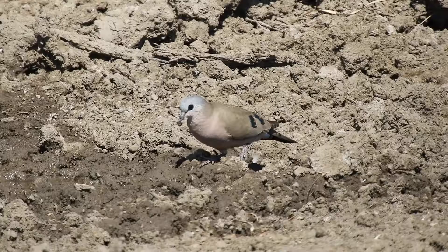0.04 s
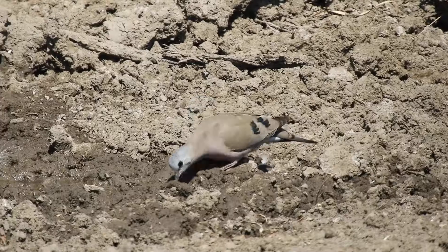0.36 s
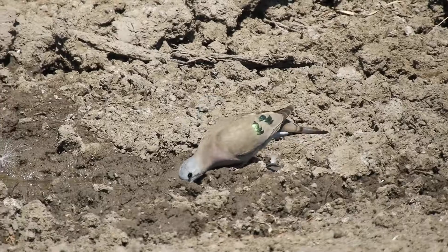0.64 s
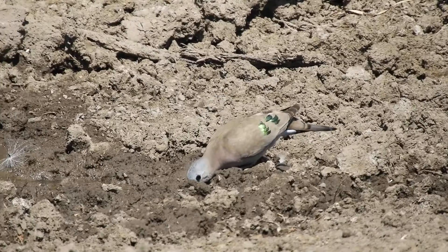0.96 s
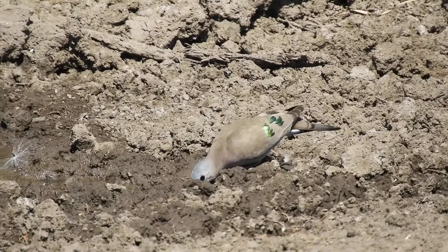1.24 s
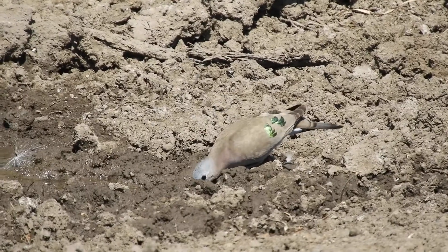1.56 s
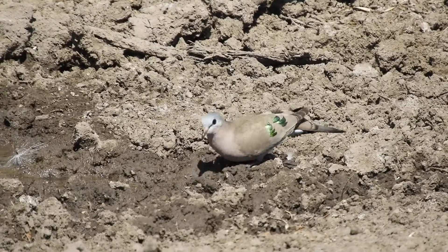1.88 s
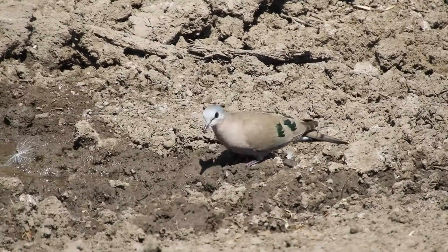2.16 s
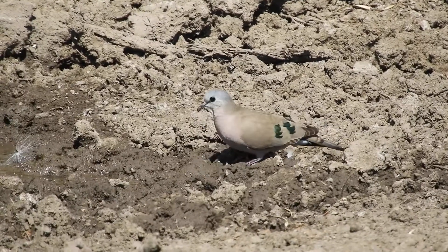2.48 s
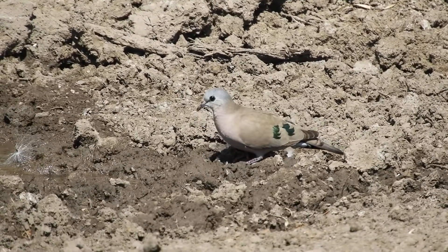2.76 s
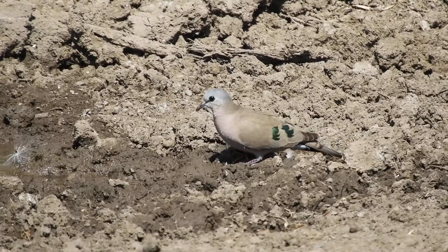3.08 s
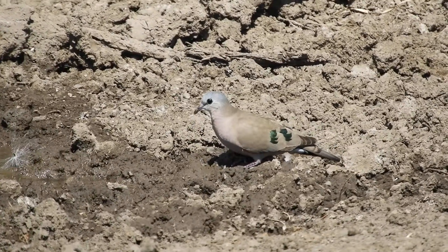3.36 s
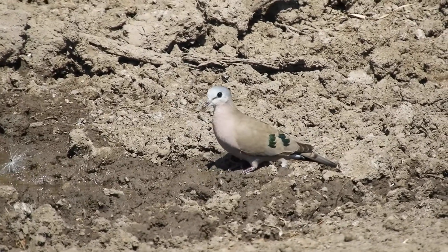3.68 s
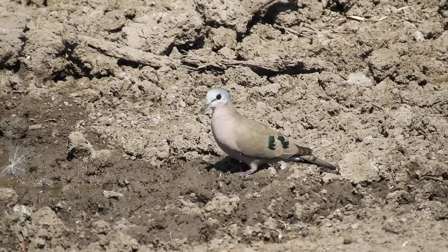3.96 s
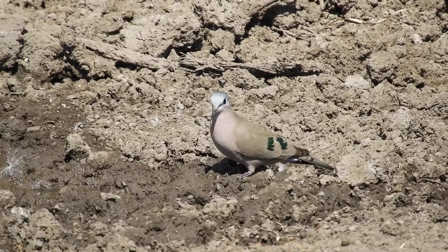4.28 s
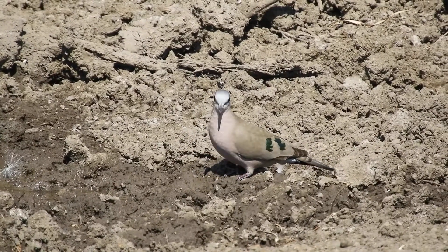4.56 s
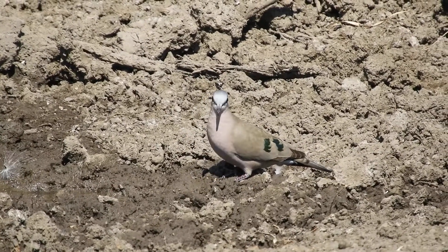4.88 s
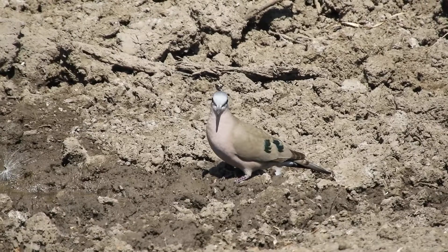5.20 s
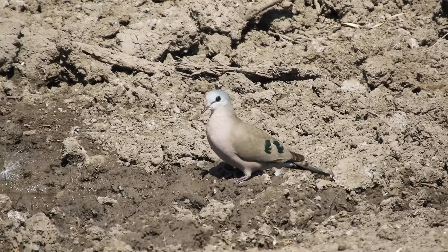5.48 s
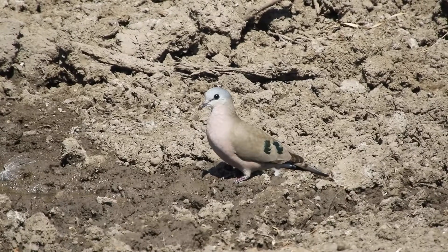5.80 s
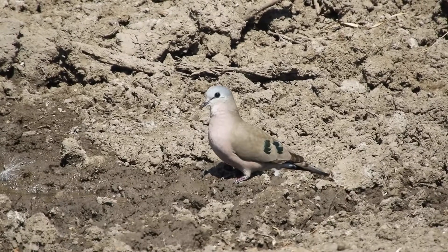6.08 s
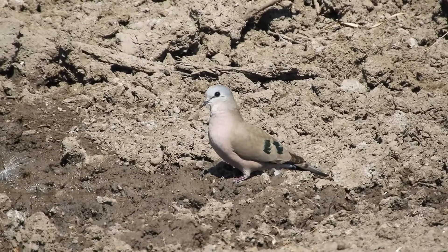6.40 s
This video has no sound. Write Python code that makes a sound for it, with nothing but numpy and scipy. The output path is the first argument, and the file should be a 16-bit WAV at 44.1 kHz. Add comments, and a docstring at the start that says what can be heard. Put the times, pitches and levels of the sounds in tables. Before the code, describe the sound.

Outdoors in open ground, wind buffets the microphone in uneven low gusts, with several hard thumps. Much quieter, a small bird whistles twice, high and rising, among scattered dry clicks, short rustles and distant chirps over a soft hiss. High twittering rises briefly in the middle. Near the end a faint trill passes with a single sharp tick right at the microphone, and the gusts fade away.

```python
"""A dove drinks at a muddy waterhole. The camera's sound opens with a click, and gusts buffet both ports
of its microphone over a soft hiss. A small bird gives the first of two thin, rising, two-voiced
whistles. Hard buffets pop; after each the hiss dips and swells back. A few dry clicks and brief rustles
follow, and other birds chirp farther off. A high twittering swells around 3 s; near 5 s come
a faint trill and one very sharp tick, and then the wind dies down."""
import sys
import numpy as np
from scipy import signal
from scipy.fft import rfft, irfft, next_fast_len
from scipy.io import wavfile
from scipy.ndimage import uniform_filter1d, minimum_filter1d, map_coordinates

SR = 44100
rng = np.random.default_rng(int(sys.argv[2]) if len(sys.argv) > 2 else 0)


def materialize(psi):
    """Save the field psi as 16-bit PCM at rate SR to the path in sys.argv[1].

    A 1-D psi becomes a single channel; in a 2-D psi each row is a channel.
    """
    bounded = np.clip(np.atleast_2d(psi).T, -1, 1)
    quanta = np.round(bounded * 32767).astype(np.int16)
    wavfile.write(sys.argv[1], SR, quanta)


N = 292824
TIME = np.arange(N) / SR


def amp(db):
    return 10 ** (np.asarray(db) / 20)


def unit_rms(x):
    return x / np.sqrt(np.mean(x ** 2, axis=-1, keepdims=True) + 1e-20)


def running_rms(x, window_s):
    return np.sqrt(np.abs(uniform_filter1d(x ** 2, max(int(window_s * SR), 1))) + 1e-9)


def along(points, hz):
    """Read (freq_hz, value) points on a log frequency axis."""
    freqs, values = np.transpose(points)
    return np.interp(np.log(hz + 1), np.log(freqs + 1), values)


def automation(rows):
    """One curve for each column after the time."""
    times, *columns = np.transpose(rows)
    return [np.interp(TIME, times, column) for column in columns]


def wobble(rate, n=N):
    """A smooth random curve, rate knots a second."""
    return map_coordinates(rng.standard_normal(int(n * rate / SR) + 4), [np.arange(n) * rate / SR])


def filtered(x, response):
    """EQ x with a gain that is a function of frequency."""
    n = x.shape[-1]
    size = next_fast_len(n + 8192)
    return irfft(rfft(x, size) * response(np.fft.rfftfreq(size, 1 / SR)), size)[..., :n]


def noise(spectrum):
    """Two unrelated noises of rms 1 with the given colour."""
    return unit_rms(filtered(rng.standard_normal((2, N)), lambda hz: amp(along(spectrum, hz))))


def tone(hz):
    """A sine of rms 1 on a moving pitch."""
    return np.sqrt(2) * np.sin(2 * np.pi * np.cumsum(hz) / SR)


def panned(pan_db):
    """Constant-power gains; pan_db is left minus right."""
    gains = amp([[pan_db / 2], [-pan_db / 2]])
    return gains / np.sqrt(np.mean(gains ** 2))


def add(track, start_s, x):
    """Mix x into the track from start_s."""
    part = track[..., max(round(start_s * SR), 0):][..., :x.shape[-1]]
    part += x[..., :part.shape[-1]]


# Gust automation, before trims and surges: time_s, rumble_db, flutter_db, pan_db
GUSTS = [(0.13, -21, -51.5, 14), (0.36, -18.5, -44.5, 10), (0.6, -29, -57.5, 3), (0.83, -35.5, -70.5, 8),
         (1.08, -16.0, -45.5, -9), (1.43, -28.5, -66, 7), (1.7, -11, -36, 12.5), (1.92, -14, -35, 14.5),
         (2.07, -23.5, -50, 2), (2.35, -11, -32.5, 3.5), (2.5, -18.5, -42.5, -1), (2.75, -20.0, -41, 4.5),
         (3.28, -20.5, -53, 1), (3.68, -24.5, -50, 14), (4.27, -11, -27.5, 5), (4.45, -16.5, -38.5, 7),
         (4.75, -17.5, -40.5, 9.5), (5.2, -12, -29.0, 3.5), (5.58, -25, -54, 5), (5.75, -17.5, -43.5, 17),
         (6.0, -29.5, -57, 3), (6.3, -20.5, -51.5, 7.5), (6.42, -44, -78, 10), (6.63, -52, -69, -1)]
# Single puffs on the rumble; a port in the lee falls instead: centre_s, length_s, left_db, right_db
WIND_PUFFS = [(0.27, 0.024, 8.5, 12), (0.689, 0.076, -1, 13), (1.165, 0.068, 13.5, 3),
              (1.33, 0.054, 10.5, 13), (1.492, 0.055, 13, -13), (1.829, 0.029, 3, 9.5),
              (1.973, 0.073, 0, 11.5), (2.389, 0.048, 5.5, 5.5), (2.807, 0.023, 8.5, 1),
              (2.9, 0.046, 10, 4.5), (3.153, 0.11, 5.5, -8.5), (3.303, 0.17, 3.5, -13),
              (3.551, 0.082, 9.5, -15), (3.808, 0.08, 7.5, 2), (4.547, 0.086, 4.0, -1),
              (4.945, 0.031, 4.0, -2.5), (5.433, 0.069, 6.0, -1.5), (5.849, 0.03, 19, 6),
              (5.921, 0.062, 8.5, 10), (6.029, 0.052, 6.5, 3.5), (6.121, 0.03, 11, 9.5),
              (6.221, 0.043, 4.5, 8)]
# Brief lulls at both ports: centre_s, length_s, dip_db
WIND_LULLS = [(0.661, 0.039, -24), (3.242, 0.065, -8.5), (3.477, 0.016, -11.5), (5.882, 0.034, -3),
              (6.075, 0.025, -12), (6.172, .035, -10)]
# Colours of the low rumble, the brighter flutter and its upper fringe: freq_hz, level_db
RUMBLE_EQ = [(15, -42.5), (25, -19), (45, -7.5), (76, 2), (120, 2), (175, 0), (212, -4), (250, -17),
             (310, -27.5), (450, -65.5), (900, -120)]
FLUTTER_EQ = [(120, -59.5), (250, 1.5), (340, 2), (450, -7.5), (600, -25.5), (900, -46.5), (3000, -120)]
FRINGE_EQ = [(250, -50), (450, 5), (620, -1.5), (760, -12.5), (950, -33), (1600, -39.5), (6000, -110)]


def wind(rumble_trim_db=-1, flutter_trim_db=2, fringe_trim_db=-9, swirl_db=1.5, fitful_db=0.6,
         lump_db=2.5, flutter_growth=1.297, fringe_growth=1.6, knee_db=-26, deep_hz=86, even_db=-19.5):
    """Each port has its own eddies; the strongest tear off a brighter flutter in short lumps."""
    rumble_db, flutter_db, pan_db = automation(GUSTS)
    facing_db = np.array([pan_db, -pan_db]) / 2
    weakness = (rumble_db.max() - rumble_db) / np.ptp(rumble_db)  # weak wind is more fitful
    surge_db = (swirl_db + fitful_db * weakness) * np.array([wobble(16), wobble(16)])
    bump = lambda centre_s, length_s: np.exp(-(2 * (TIME - centre_s) / length_s) ** 2)
    for centre_s, length_s, left_db, right_db in WIND_PUFFS:
        surge_db += np.outer([left_db, right_db], bump(centre_s, length_s))
    for centre_s, length_s, dip_db in WIND_LULLS:
        surge_db += dip_db * bump(centre_s, length_s)
    eddies = noise(RUMBLE_EQ)
    eddies = unit_rms(eddies / running_rms(eddies, 0.06))  # the gusts alone set the slow level
    lumps = amp(lump_db * np.array([wobble(42), wobble(42)])) * running_rms(eddies, 0.008) ** 1.53
    lumps = unit_rms(lumps / running_rms(lumps, 0.16))
    gust_db = flutter_db + flutter_growth * (facing_db + surge_db)
    fringe_db = knee_db + fringe_growth * (gust_db - knee_db)  # strong gusts are brighter
    flutter = amp(gust_db + flutter_trim_db) * noise(FLUTTER_EQ)
    fringe = amp(fringe_db + fringe_trim_db) * noise(FRINGE_EQ)
    port_db = rumble_db + 0.74 * facing_db
    deep = filtered(eddies, lambda hz: 1 / (1 + (hz / deep_hz) ** 4))
    rumble = eddies - deep + amp(0.79 * (even_db - port_db)) * deep  # slow wind has larger eddies
    return amp(port_db + surge_db + rumble_trim_db) * rumble + lumps * (flutter + fringe)


# Stereo image of airborne sound: freq_hz, left_right_correlation
AIR_IMAGE = [(200, 0.15), (1500, 0.17), (4500, 0.26), (9000, 0.22), (13000, 0.08)]


def airborne(pair):
    """Make two unrelated signals partly alike, as airborne sound is at the two ports."""
    angle = lambda hz: np.arccos(along(AIR_IMAGE, hz)) / 2
    mid, side = filtered(pair, lambda hz: np.array([np.cos(angle(hz)), np.sin(angle(hz))]))
    return np.array([mid + side, mid - side])


# Colour of the open-air bed: freq_hz, level_db
HISS_EQ = [(100, 23), (500, 4.5), (1100, -0.5), (2100, -2.5), (3400, -3), (4300, 1.5), (6000, -0.5),
           (9300, -0.5), (11000, -7.5), (14700, -12), (15500, -23)]


def hiss(opening_db=-47, patchy_db=1.85, drop_s=0.0096):
    """A soft, patchy bed of air and far calls; it ducks after each hard buffet and swells back."""
    level_db = opening_db
    for start_s, _, _, _, ducked_db, recovery_db_per_s in HARD_BUFFETS:
        ducked = np.clip((TIME - start_s) / drop_s, 0, 1)
        recovering_db = ducked_db + recovery_db_per_s * (TIME - start_s)
        level_db = (1 - ducked) * level_db + ducked * recovering_db
    bands = signal.stft(noise(HISS_EQ), nperseg=512)[2]
    patches = uniform_filter1d(rng.standard_normal(bands.shape[1:]), size=3, axis=0)
    patches = unit_rms(uniform_filter1d(patches, size=10, axis=1))
    air = signal.istft(bands * amp(patchy_db * patches), nperseg=512)[1][:, :N]
    return amp(level_db) * (airborne(air) + distant_calls())


def distant_calls(count=70, low_hz=1000, high_hz=5500, length_s=0.057, glide=0.32, waver=0.058):
    """Many very distant gliding calls, tucked into the hiss."""
    out = np.zeros((2, N))
    progress = np.linspace(0, 1, int(length_s * SR))
    for when, height in rng.random((count, 2)):
        slope, size, pan = rng.standard_normal(3)
        bend = glide * height * slope * progress + waver * wobble(150, len(progress))
        pitch_hz = low_hz * (high_hz / low_hz) ** height * np.exp(bend)
        envelope = amp(-19 + 2 * size) * np.hanning(len(progress))
        add(out, when * N / SR, panned(3 * pan) * envelope * tone(pitch_hz))
    return out


# The camera's start-up click, then the dry clicks:
# start_s, body_db, body_t60_s, treble_db, treble_t60_s, treble_pan_db
DRY_CLICKS = [(0.126, -24.5, 0.0078, -33, 0.0046, -13), (0.477, -44.5, .02, -32, 0.0082, 1.5),
              (0.533, -39.5, 0.037, -34.5, 0.0077, -5.5), (2.248, -45.5, 0.014, -34, 0.01, 2),
              (2.691, -57, 0.016, -46.5, 0.02, 0), (3.785, -62.5, .02, -51, 0.0082, 5),
              (3.914, -39.5, 0.022, -42.5, .014, -5.5), (4.291, -59, .02, -49.5, 0.025, -4.5)]
# Resonances of a click's hollow body: centre_hz, width_hz, level_db
CLICK_BODY = [(1020, 230, 9), (1660, 300, -4), (2390, 710, -1.5), (3430, 400, -10.5)]
# Colour of its treble: freq_hz, level_db
TREBLE_EQ = [(1000, -66.5), (3000, -34.5), (4300, -2.5), (5500, 1), (7500, -2), (9400, 2.5), (11000, -19.5),
             (15000, -23.5)]


def clicks(treble_delay_s=0.011, tail_db=-24, tail_t60_s=0.27):
    """Each click is one dry, hollow tick whose treble the camera passes about 10 ms late."""
    body, treble = np.zeros((2, 2, N))
    t = np.arange(SR // 5) / SR
    decay = lambda t60_s: amp(-60 * t / t60_s) + amp(tail_db - 60 * t / tail_t60_s)
    for start_s, body_db, body_t60_s, treble_db, treble_t60_s, pan_db in DRY_CLICKS:
        add(body, start_s, amp(body_db) * panned(2 * pan_db) * decay(body_t60_s))
        add(treble, start_s + treble_delay_s, amp(treble_db) * panned(pan_db) * decay(treble_t60_s))
    peaks = lambda hz: sum(amp(level_db) / (1 + (2 * (hz - centre_hz) / width_hz) ** 2)
                           for centre_hz, width_hz, level_db in CLICK_BODY)
    hollow = unit_rms(filtered(rng.standard_normal((2, N)), peaks))
    return body * hollow + treble * airborne(noise(TREBLE_EQ))


# The near bird: start_s, length_s, level_db, low_pitch_ratio, high_pitch_ratio, high_trim_db
WHISTLE_NOTES = [(0.195, .146, -47, 0.97, 1.005, -1.5), (1.575, 0.19, -37, 1, 0.999, 1.5)]
# Its low and high voice: start_hz, end_hz, bend_power (1 is straight), peak_db, edge_sag_db
WHISTLE_VOICES = [(6320, 7600, 1.3, 0, 6.9), (8280, 9470, 1.9, -6, 8.8)]


def whistles(hook_depth=0.052, hook_s=0.018, hook_period_s=0.02, hook_crest_s=0.0018,
             attack_s=0.004, release_s=0.002, waver=0.0025, flicker_db=1.55):
    """Both sides of the syrinx sound at once: a quick hook, then a long rise, loudest halfway."""
    out = np.zeros(N)
    for start_s, length_s, level_db, low_ratio, high_ratio, high_trim_db in WHISTLE_NOTES:
        t = np.arange(int(length_s * SR)) / SR
        progress = t / length_s
        hook_fade = np.exp(-(t / hook_s) ** 4)
        hook = hook_depth * hook_fade * np.cos(2 * np.pi * (t - hook_crest_s) / hook_period_s)
        gate = np.clip(np.minimum(t / attack_s, (length_s - t) / release_s), 0, 1)
        for voice, ratio, trim_db in zip(WHISTLE_VOICES, (low_ratio, high_ratio), (0, high_trim_db)):
            start_hz, end_hz, bend_power, peak_db, sag_db = voice
            rise_hz = end_hz - (end_hz - start_hz) * (1 - progress) ** bend_power
            pitch_hz = ratio * rise_hz * (1 + hook + waver * wobble(250, len(t)))
            shape_db = peak_db - sag_db * np.abs(2 * progress - 1) + flicker_db * wobble(90, len(t))
            add(out, start_s, gate * amp(level_db + trim_db + shape_db) * tone(pitch_hz))
    return out


# Hard wind hits: peak_s, push_db, pop_db, pan_db, ducked_hiss_db, hiss_recovery_db_per_s
HARD_BUFFETS = [(0.298, 0, -20.5, 10.5, -57, 6), (1.8571, -7, -17, 19.5, -55.5, 9.5),
                (2.413, -15, -28.5, -19, -56.5, 7.5), (3.544, -2, -25.5, 25.5, -55.5, 4),
                (4.3152, -8, -29.5, 10.5, -54.5, 1.75), (5.855, -4, -18, 25, -56.5, 4)]


def buffets(push_hz=130, build_s=0.0045, release_s=0.0018, pop_s=0.00063, tear_db=-10, tear_s=0.0069):
    """A hard eddy tears briefly, swings the diaphragm for a cycle or two and breaks off with a pop."""
    hits, tears = np.zeros((2, 2, N))
    t = np.arange(-SR // 20, SR // 20) / SR
    swell = lambda rise_s: np.exp(np.where(t < 0, t / rise_s, -t / release_s))
    push = np.cos(2 * np.pi * push_hz * t) * swell(build_s)
    pop = (1 + 0.3 * np.sign(t)) * np.exp(-np.abs(t) / pop_s)
    for peak_s, push_db, pop_db, pan_db, _, _ in HARD_BUFFETS:
        add(hits, peak_s + t[0], -panned(pan_db) * (amp(push_db) * push + amp(pop_db) * pop))
        add(tears, peak_s + t[0], panned(pan_db) * amp(pop_db + tear_db) * swell(tear_s))
    return hits + tears * noise(FRINGE_EQ)


# Short rustles: start_s, length_s, level_db
SHORT_RUSTLES = [(0.536, 0.084, -71.5), (2.523, 0.046, -45.5), (2.95, .06, -54)]


def rustles():
    """Soft-edged brushes of noise in the colour of the clicks' treble."""
    envelope = np.zeros(N)
    for start_s, length_s, level_db in SHORT_RUSTLES:
        add(envelope, start_s, amp(level_db) * np.hanning(int(length_s * SR)))
    return envelope * airborne(noise(TREBLE_EQ))


# Farther birds: start_s, length_s, start_hz, middle_hz, end_hz, level_db (before trim), pan_db
FAR_CHIRPS = [(0.598, 0.062, 10500, 10300, 10200, -60.5, 8), (0.858, 0.094, 1077, 1084, 1080, -66.5, 2),
              (0.916, .065, 4300, 3540, 2870, -62, 0), (1.005, .025, 3500, 3500, 3480, -63, 8),
              (1.078, 0.039, 4080, 4310, 4430, -55, 8), (1.198, 0.034, 5320, 4610, 4130, -51, 6),
              (1.234, .042, 3710, 3380, 2930, -61, 3), (1.33, 0.019, 3870, 3330, 3020, -57.5, 0),
              (2.942, 0.041, 2230, 1980, 1920, -59, -1), (3.01, 0.036, 2040, 2140, 2130, -57, -5),
              (3.197, .09, 9500, 9450, 9400, -60, -9), (3.215, .1, 1090, 1036, 1060, -63, -9),
              (3.45, .04, 4050, 3330, 2760, -59, -9), (4.202, 0.089, 9100, 9400, 9360, -62, -3),
              (4.265, .03, 4470, 4200, 3900, -60, -3), (4.425, .04, 4040, 4240, 4550, -59.5, 14.5),
              (4.475, .065, 8570, 8150, 8950, -60.5, 5), (4.475, 0.06, 6700, 6640, 7050, -62, -2),
              (4.552, 0.049, 5300, 4490, 3830, -57.5, 8.5), (5.108, .03, 5740, 5200, 4750, -66, 4),
              (5.335, 0.024, 6000, 4950, 4440, -53.5, -6.5)]


def chirps(waver=0.008, flicker_db=2.5, trim_db=-4.5):
    """Far birds sing short, unsteady glides."""
    out = np.zeros((2, N))
    for start_s, length_s, start_hz, middle_hz, end_hz, level_db, pan_db in FAR_CHIRPS:
        progress = np.linspace(0, 1, int(length_s * SR))
        glide_hz = np.polyval(np.polyfit([0, 0.5, 1], [start_hz, middle_hz, end_hz], 2), progress)
        arch = np.abs(np.sin(np.pi * progress)) ** 0.46
        envelope = arch * amp(level_db + trim_db + flicker_db * wobble(88, len(progress)))
        pitch_hz = glide_hz * (1 + waver * wobble(230, len(progress)))
        add(out, start_s, panned(pan_db) * envelope * tone(pitch_hz))
    return out


# Fader ride of the high twittering: time_s, level_db
TWITTER_SWELL = [(2.9, -76.5), (3.1, -62.5), (3.3, -70), (3.42, -59), (3.55, -64), (3.7, -86.5)]
# Its colour: freq_hz, level_db
TWITTER_EQ = [(5000, -27), (7500, -8), (8800, -1), (9700, -4), (11000, -21), (14000, -41)]


def twitter(flicker_db=2):
    """A high band of noise swells and flickers."""
    level_db = automation(TWITTER_SWELL)[0] + flicker_db * wobble(60)
    return amp(level_db) * airborne(noise(TWITTER_EQ))


def trill(start_s=4.98, gap_s=0.019, slowing_s=0.00018, tick_s=0.0042, top_hz=9500, bottom_hz=7700,
          level_db=-59, count=21):
    """A faint, uneven run of very high, falling ticks that slows a little."""
    out = np.zeros(N)
    progress = np.linspace(0, 1, int(tick_s * SR))
    fall_hz = top_hz + (bottom_hz - top_hz) * progress
    for k, (size, late, detune) in enumerate(rng.standard_normal((count, 3))):
        tick = np.sin(np.pi * progress) * tone(fall_hz * (1 + 0.03 * detune))
        onset_s = start_s + k * gap_s + slowing_s * k * k / 2 + 0.002 * late
        add(out, onset_s, amp(level_db + 2 * size) * tick)
    return out


# One very sharp tick: peak_s, left_level_db
SHARP_TICK = (5.2141, -9)


def sharp_tick(decay_s=0.0001):
    """A single hard tick right at the microphone pushes the two ports in opposite ways."""
    peak_s, level_db = SHARP_TICK
    left = np.zeros(N)
    t = np.arange(-SR // 200, SR // 200) / SR
    add(left, peak_s + t[0], amp(level_db) * np.sign(t) * np.exp(-np.abs(t) / decay_s))
    return np.array([left, -0.7 * left])


# Decay of the outdoor reverb: freq_hz, t60_s
BANK_DECAY = [(500, .2), (4000, .35), (10000, 0.45)]


def bank_reverb(send):
    """Banks and bushes return a thin, short tail."""
    hz, t, bands = signal.stft(rng.standard_normal((2, SR // 2)), SR, nperseg=256)
    decay = amp(-60 * t / along(BANK_DECAY, hz)[:, None])
    tail = signal.istft(bands * decay, SR, nperseg=256)[1]
    return signal.fftconvolve(send, tail / np.linalg.norm(tail[0]), axes=1)[:, :N]


def scene():
    """The mix; only the whistles, chirps and trill feed the reverb."""
    near_bird = whistles() * panned(-5.5)
    far_birds = chirps() + trill()
    bed = wind() + buffets() + hiss() + twitter()
    spots = clicks() + rustles() + sharp_tick()
    reverb = bank_reverb(amp(-11) * near_bird + amp(-4.5) * far_birds)
    return bed + spots + near_bird + far_birds + reverb


def record(dry):
    """The camera's sound opens after a moment, limited to full scale and cut above its band limit."""
    open_s, fade_s, top_hz = 0.124, 0.002, 15500
    gate = np.clip((TIME - open_s) / fade_s, 0, 1)
    held_gain = minimum_filter1d(1 / np.maximum(np.abs(dry), 1), size=401)
    limiter_gain = uniform_filter1d(uniform_filter1d(held_gain, size=201), size=201)
    return filtered(dry * limiter_gain * gate, lambda hz: hz < top_hz)


dry = scene()
out = record(dry)
materialize(out)
```